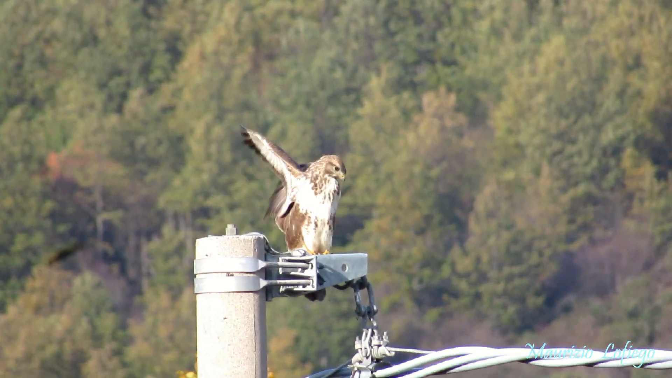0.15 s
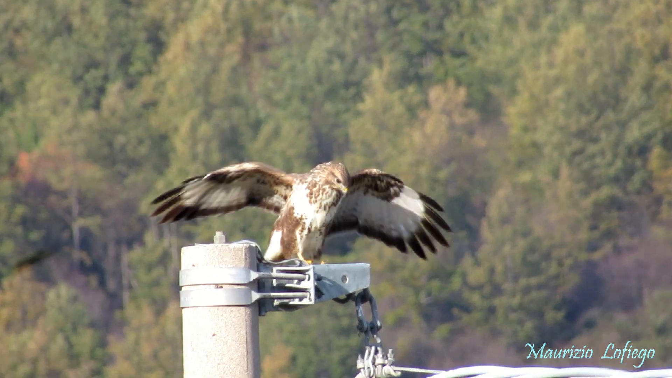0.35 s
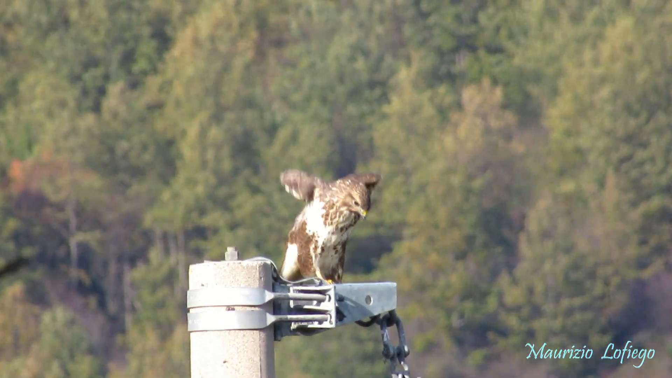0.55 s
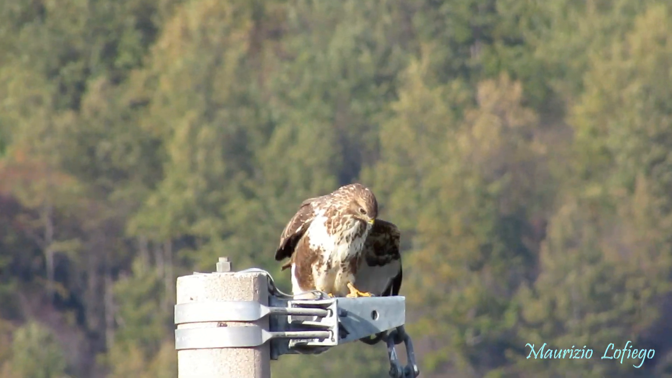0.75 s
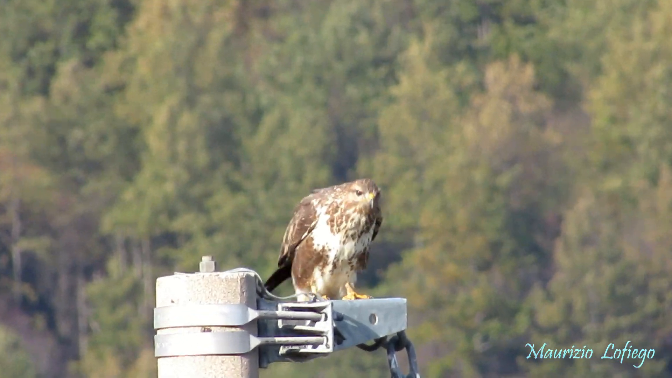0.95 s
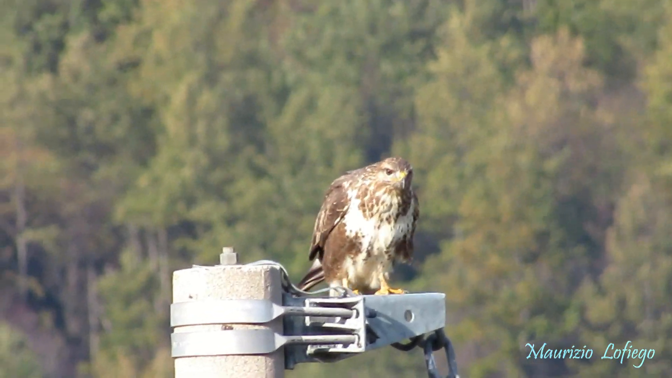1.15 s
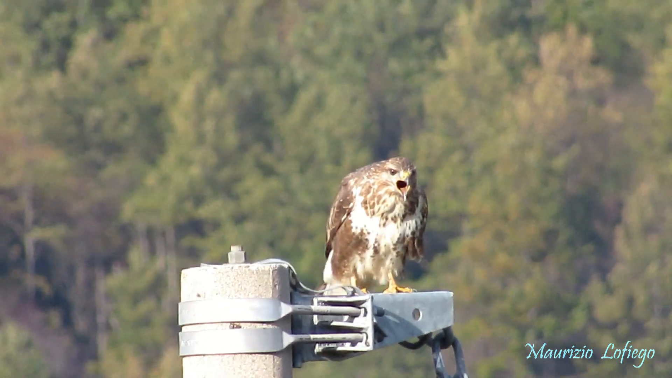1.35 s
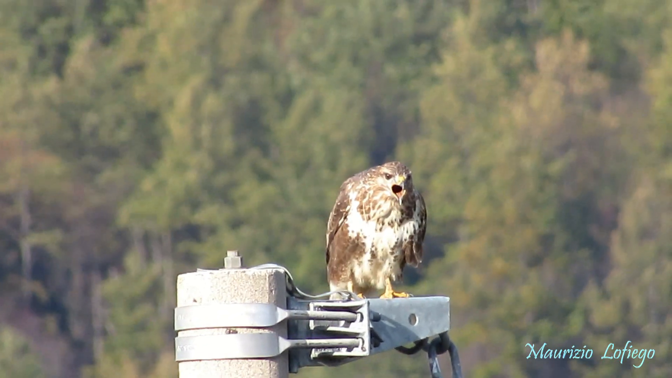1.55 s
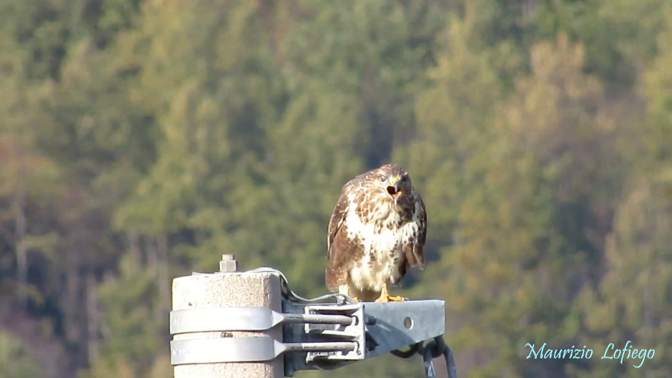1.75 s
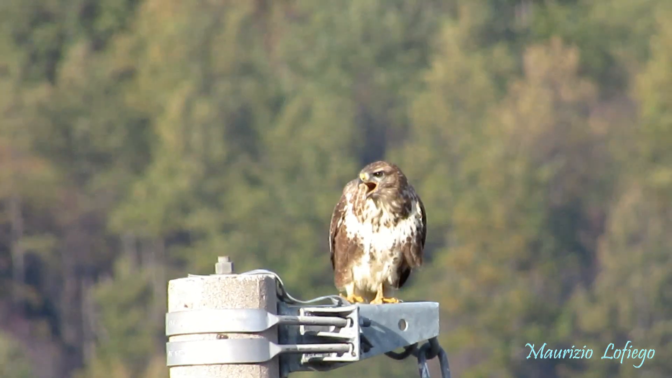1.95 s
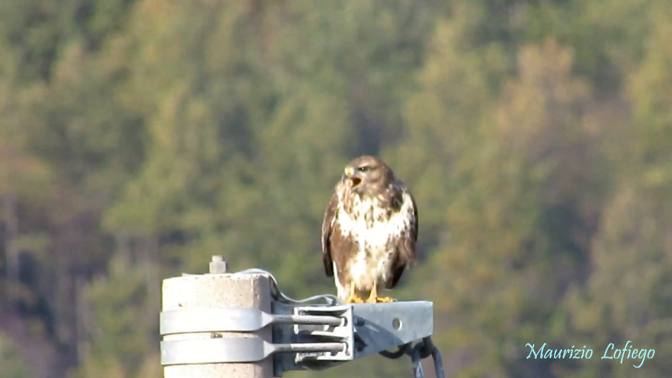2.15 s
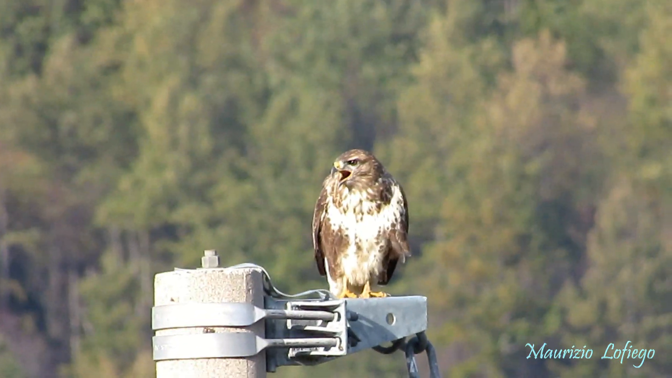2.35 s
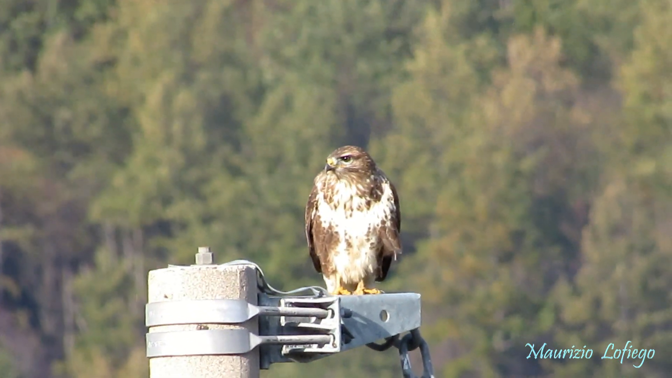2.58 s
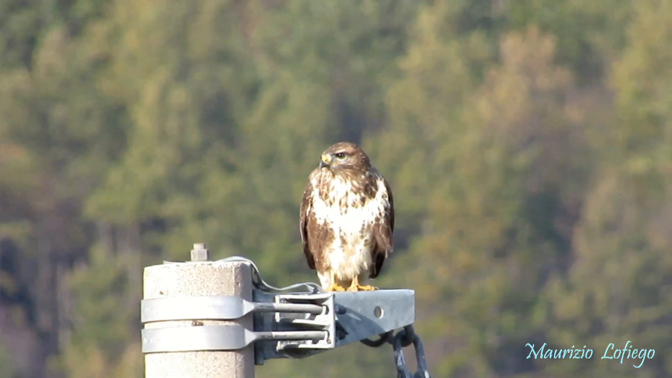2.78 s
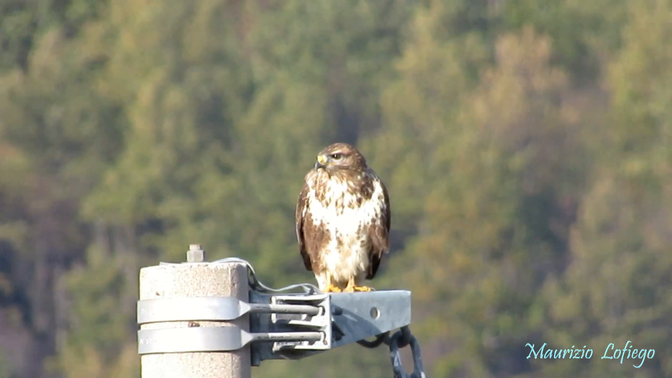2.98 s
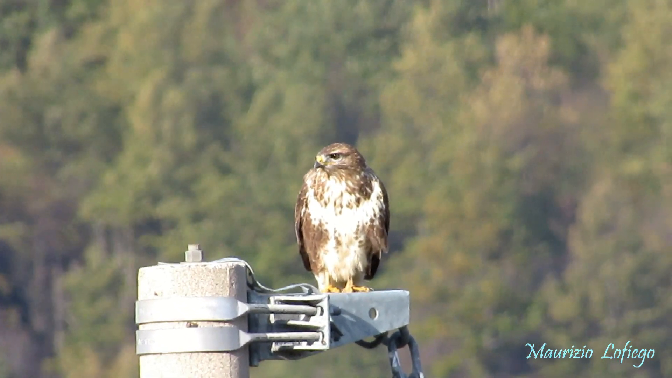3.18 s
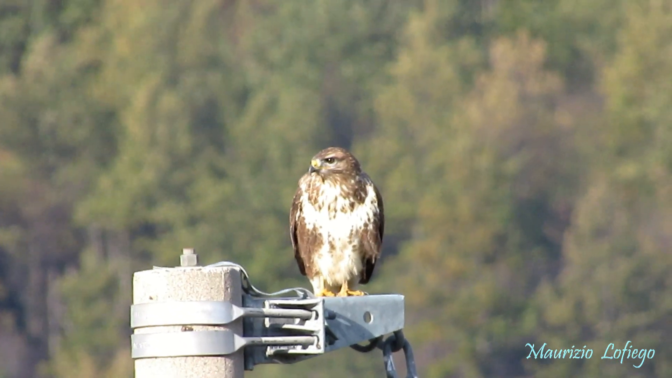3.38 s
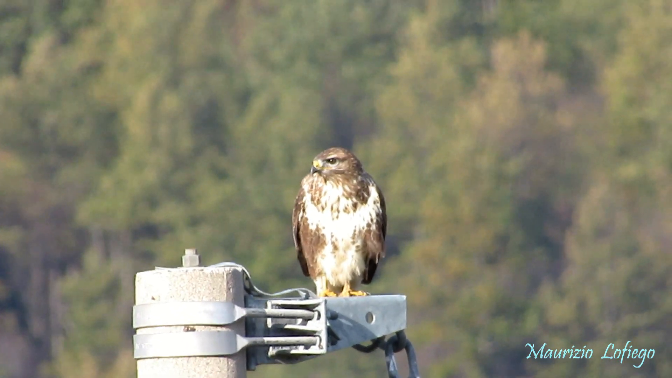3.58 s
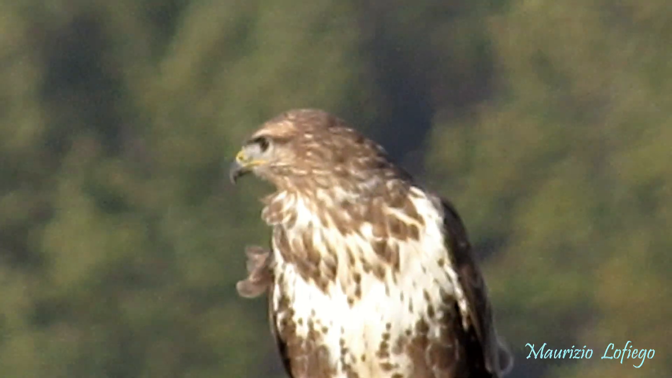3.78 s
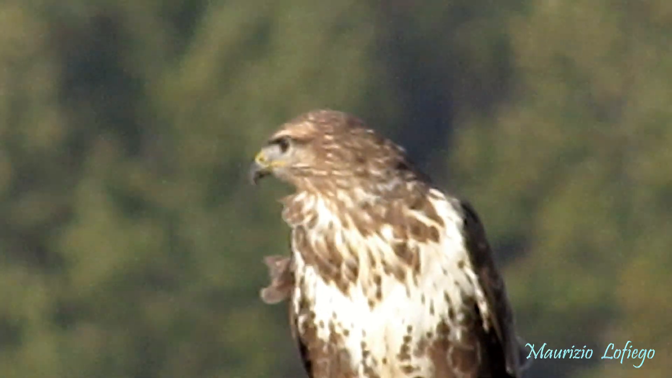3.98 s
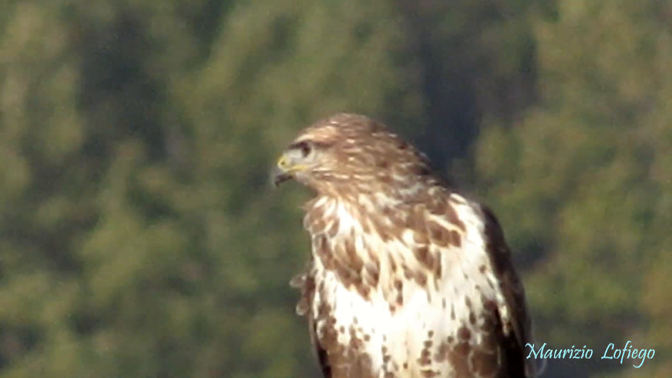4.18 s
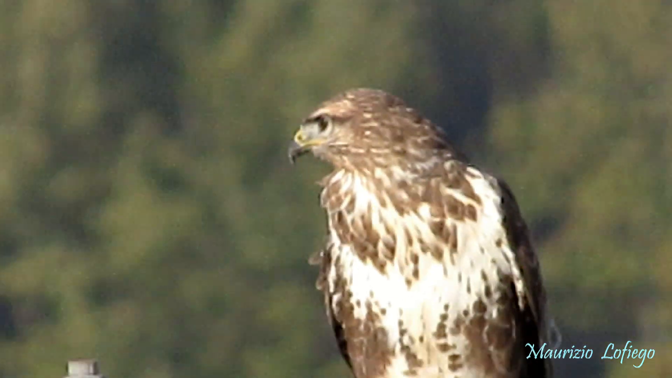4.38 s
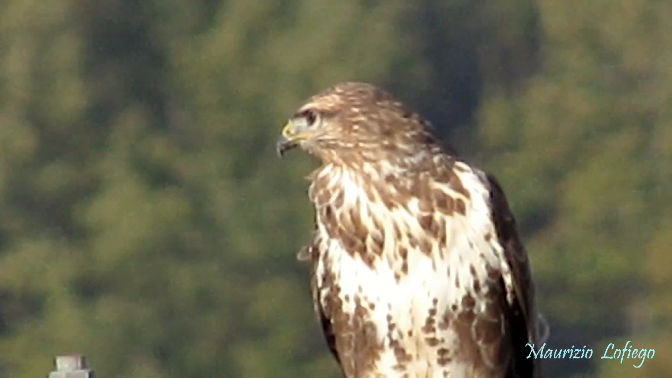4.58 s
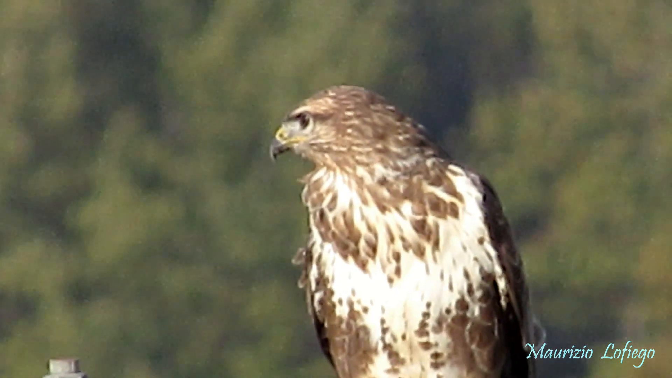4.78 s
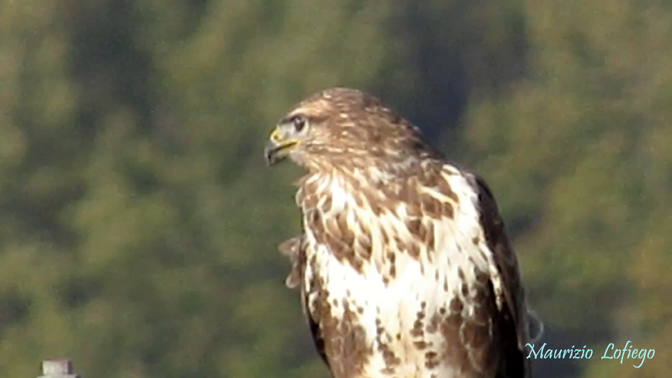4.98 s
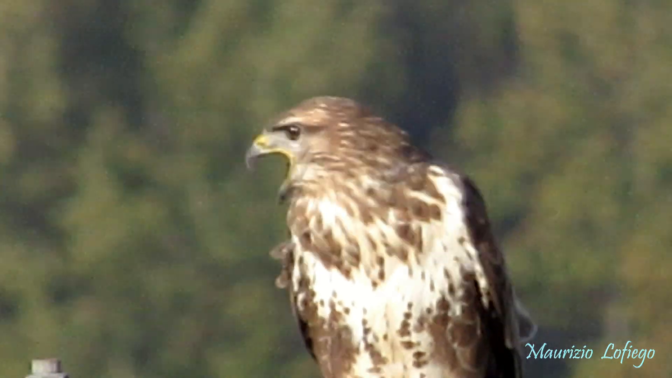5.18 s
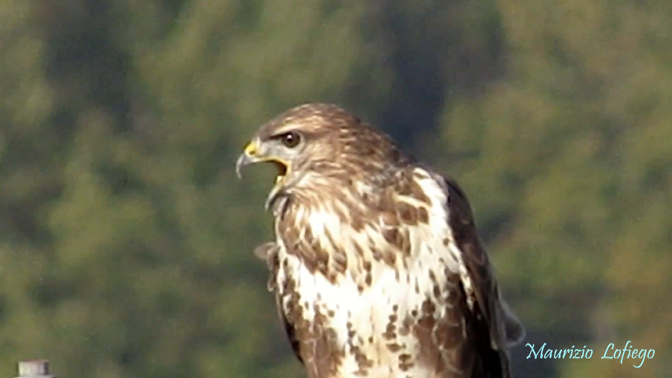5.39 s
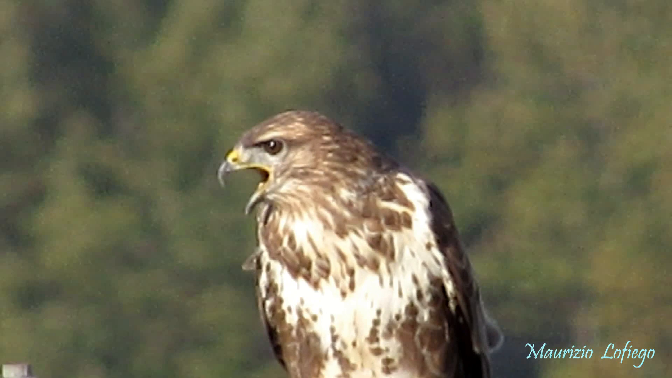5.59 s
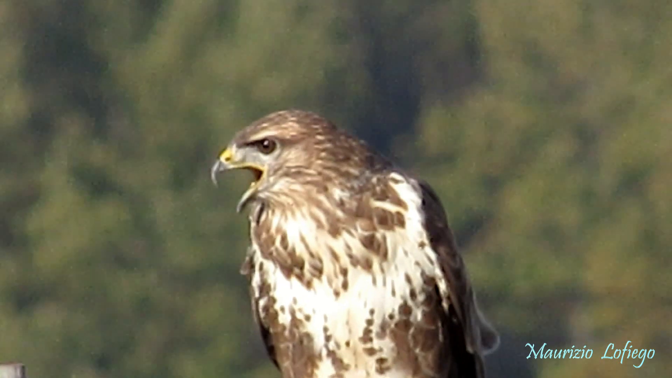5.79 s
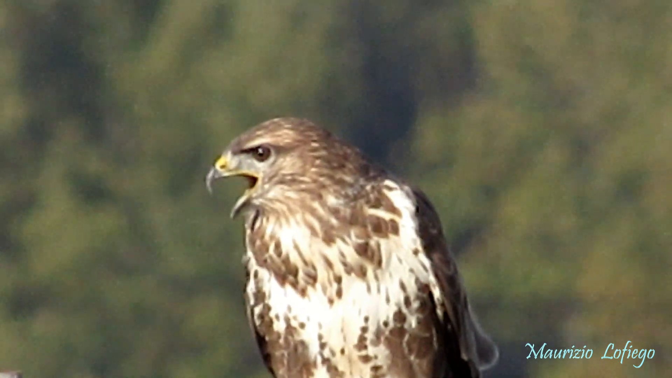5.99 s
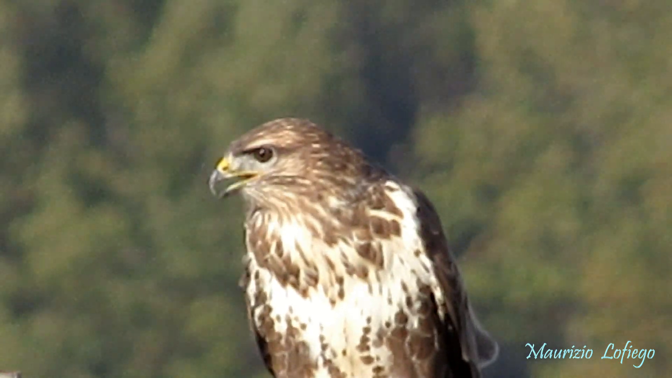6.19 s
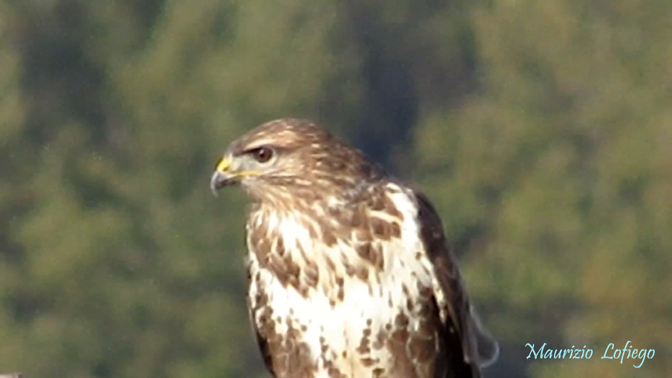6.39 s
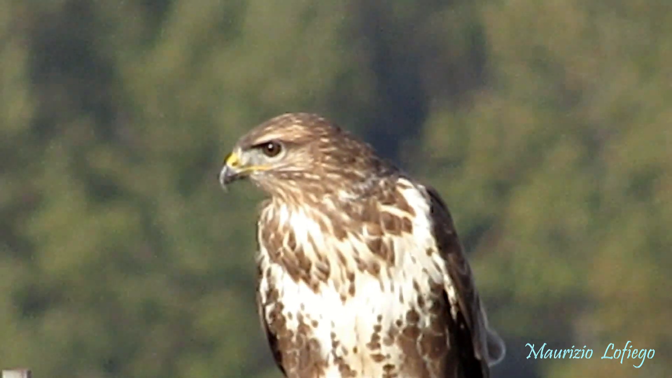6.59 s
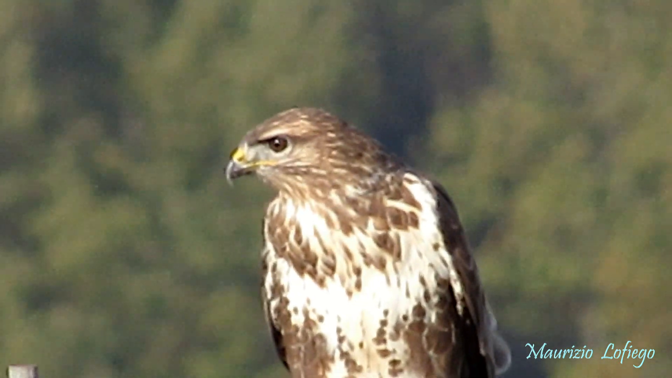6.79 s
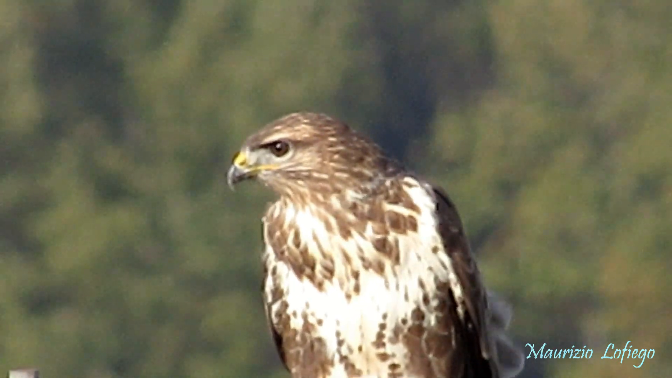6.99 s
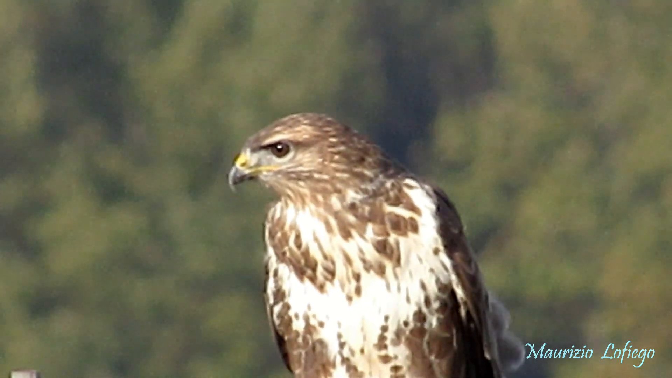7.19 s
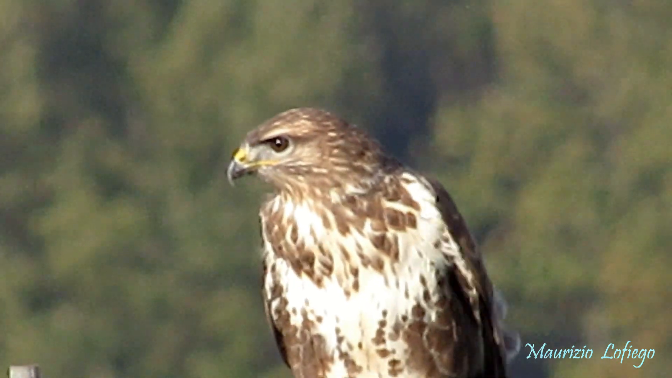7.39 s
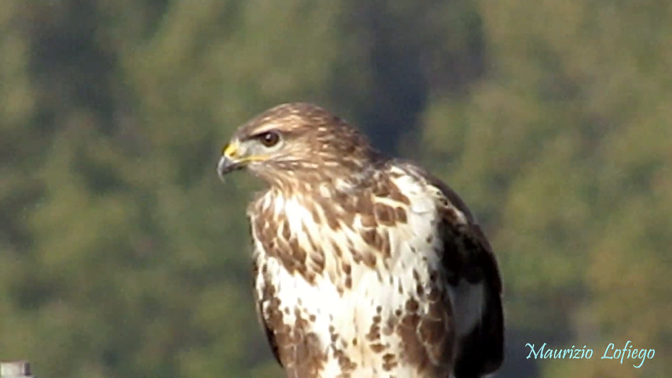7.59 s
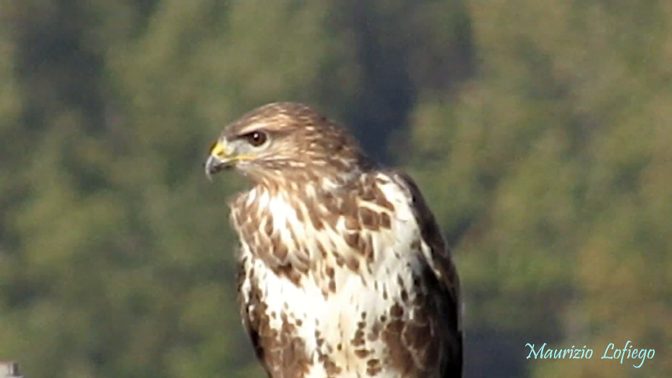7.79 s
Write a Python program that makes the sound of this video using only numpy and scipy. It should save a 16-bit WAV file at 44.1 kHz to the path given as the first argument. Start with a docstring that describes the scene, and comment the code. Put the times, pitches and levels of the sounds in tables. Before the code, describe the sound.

A buzzard gives two loud falling mews, the first turning raspy, in a quiet woodland with soft echoes and faint high bird ticks.

```python
"""A buzzard on a pole before a wooded slope mews twice: each call leaps up, then sinks through the resonances
of throat and beak, and the first breaks into a rasp where a second vibration lurches about. Another buzzard
answers far off with one wavering harmonic, and a small bird ticks in warbled whistles. Delayed copies and
scattered noise tails send soft echoes back from ground and trees. Beneath lies a low outdoor hush of filtered
noise, with short noise swells as bumps and scuffs at the microphone, and a soft click as the buzzard closes its
second call."""
import sys
import numpy as np
from scipy import signal
from scipy.fft import rfft, irfft
from scipy.io import wavfile
from scipy.ndimage import uniform_filter1d

SR = 44100
rng = np.random.default_rng(int(sys.argv[2]) if len(sys.argv) > 2 else 0)


def store_wav(level_fs):
    """Save 16-bit WAV to argv[1]."""
    pcm = np.round(np.clip(np.atleast_2d(level_fs), -1, 1) * 32767)
    wavfile.write(sys.argv[1], SR, pcm.T.astype(np.int16))


N = 346123
TIME = np.arange(N) / SR
FREQS = np.maximum(np.arange(N // 2 + 1) * SR / N, 1)

# the cry dips, and its edge changes, where no harmonic meets the main resonance
HOLLOW_HZ, HOLLOW_WIDTH_HZ = 1014, 32


def from_db(db):
    """Decibels to gain."""
    return 10 ** (np.asarray(db) / 20)


def rms_one(x):
    """Scale to unit rms."""
    return x / np.sqrt(np.mean(x ** 2) + 1e-20)


def ramp(x):
    """Hold between 0 and 1."""
    return np.clip(x, 0, 1)


def bell(x, width):
    """A smooth bump of height 1 around zero."""
    return np.exp(-(x / width) ** 2)


def in_time(rows):
    """Columns of a curve, at every sample."""
    s, *columns = np.transpose(rows)
    return [np.interp(TIME, s, c) for c in columns]


def gate(rows, fade=0.0031):
    """Open between the first and last row of a curve."""
    return ramp(np.minimum(TIME - rows[0][0], rows[-1][0] - TIME) / fade)


def colour(x, gain):
    """Filter by a gain for every frequency."""
    return irfft(rfft(x) * gain, N)


def humps(rows):
    """Bell-shaped rises and dips, in dB at every frequency."""
    return sum(db * bell(FREQS - hz, width) for hz, width, db in rows)


def shelf(x, above_hz, db):
    """Raise or lower everything above a frequency by a changing amount."""
    above = colour(x, 1 / (1 + (above_hz / FREQS) ** 20))
    return x + (from_db(db) - 1) * above


def flutter(rate_hz):
    """Random wavering up to about the given rate, at unit rms."""
    lowpass = signal.butter(2, min(rate_hz, .4 * SR), fs=SR, output="sos")
    return rms_one(signal.sosfilt(lowpass, rng.standard_normal(N)))


def evened(x, window=.02):
    """Hold the short-term level near 1; the window is in seconds."""
    size = max(int(window * SR), 2)
    power = uniform_filter1d(uniform_filter1d(x * x, size), size)
    return x / np.sqrt(np.abs(power) + 1e-12)


def turning(hz, jitter, jitter_hz):
    """Phase of a vibration whose pitch wavers by a fraction (jitter)."""
    return 2 * np.pi * np.cumsum(hz * (1 + jitter * flutter(jitter_hz))) / SR


def hush():
    """Steady outdoor noise; its low end is mostly opposed between the two channels."""
    # spectrum common to both channels, before its humps: frequency_hz, relative_level_db
    mid_points = [(12, -31.5), (20, -14), (85, -0.5), (213, 0), (282, -4.5), (315, -3.5), (452, -8),
                  (505, -3.5), (649, -9.5), (906, -10), (1820, -17.5), (2610, -21), (4950, -26),
                  (13500, -28.5), (15500, -40.5)]
    # spectrum opposed between the channels: frequency_hz, relative_level_db
    side_points = [(12, -35), (20, -13), (109, -0.5), (252, -3.5), (478, -10.5), (614, -17.5), (686, -39),
                   (746, -21), (932, -19), (1540, -26.5), (2330, -36.5), (2610, -38), (3450, -40),
                   (13100, -40.5), (15500, -55.5)]
    # humps and hollows of the common spectrum: centre_hz, width_hz, gain_db
    mid_humps = [(286.5, 17.5, 7), (498.3, 17.5, 7), (662, 79, -10.5), (982, 106, 3.5)]
    mid_db, side_db = -54.5, -46.5

    def noise(points, extra_db):
        hz, db = np.transpose(points)
        spectrum_db = np.interp(np.log(FREQS), np.log(hz), db) + extra_db
        return rms_one(colour(rng.standard_normal(N), from_db(spectrum_db)))

    mid = from_db(mid_db) * noise(mid_points, humps(mid_humps))
    side = from_db(side_db) * noise(side_points, 0)
    return mid + side * np.array([[1], [-1]])


def bumps():
    """Short swells of narrow noise: low nudges on the microphone, a few faint scuffs, and a soft click as the
    buzzard closes its second call."""
    # bumps, scuffs and the buzzard's closing click: centre_s, level_db, centre_hz, length_s
    swells = [(0.034, -58, 2520, 0.014), (0.662, -50.5, 2600, 0.0036), (0.68, -67, 2680, 0.035),
              (2.267, -48.5, 66, 0.049), (2.745, -57, 55.3, 0.14), (2.835, -56, 65, 0.082),
              (6.085, -45.5, 258, 0.036), (6.401, -57.5, 1980, 0.025), (7.098, -52, 43.1, 0.027)]
    out = 0
    for s, db, hz, length in swells:
        half_width = 30 + 0.067 * hz
        edges = [max(hz - half_width, 15), hz + half_width]
        band = signal.butter(2, edges, "band", fs=SR, output="sos")
        noise = rms_one(signal.sosfilt(band, rng.standard_normal(N)))
        out = out + from_db(db) * np.exp(-2 * ((TIME - s) / length) ** 2) * noise
    return out


def woods(x, wet_db, t60, delay, dull_hz, spread=0.8):
    """Leaves and trunks scatter a thin, dull tail (t60 and delay in s), slightly different on each side."""
    t = TIME[:2 * SR]
    scatter = rng.standard_normal(len(t)) + spread * rng.standard_normal((2, len(t)))
    tail = scatter * from_db(-60 * t / t60) * ramp(t / delay - .5)
    tail = tail / np.sqrt(np.sum(tail[0] ** 2))
    lowpass = signal.butter(1, min(dull_hz, .4 * SR), fs=SR, output="sos")
    tail = signal.sosfilt(lowpass, tail)
    return from_db(wet_db) * signal.fftconvolve(x[None], tail, axes=1)[:, :N]


def small_bird(swing=0.065, swing_hz=700, sweep=0.067, tick_db=-0.5, early_s=0.001, low_hz=5700, high_hz=7750):
    """Each tick is a short, fiercely warbled whistle that slides down within the band of a tiny throat."""
    # ticks, each begun early_s sooner and offset by tick_db: start_s, level_db, start_hz, length_s
    tick_rows = [(1.476, -49.5, 7230, 0.016), (3.3132, -42.5, 7210, 0.01), (3.483, -45.5, 7200, 0.013),
                 (4.51, -45, 7000, 0.012), (4.658, -43.5, 7120, 0.016), (4.947, -41.5, 6900, 0.012),
                 (5.126, -38, 7050, 0.012), (7.099, -44.5, 6520, 0.01)]
    out, warble = np.zeros(N), flutter(swing_hz)
    for s, db, hz, length in tick_rows:
        at = int((s - early_s) * SR) + np.arange(max(int(length * SR), 8))
        age = np.linspace(0, 1, len(at))
        pitch = hz * (1 + swing * warble[at] - sweep * age)
        phase = 2 * np.pi * np.cumsum(pitch) / SR
        swell = np.abs(np.sin(np.pi * age ** 0.66))
        out[at] += from_db(db + tick_db) * swell * np.sin(phase)
    return signal.sosfilt(signal.butter(3, [low_hz, high_hz], "band", fs=SR, output="sos"), out)


def far_buzzard():
    """Only the strongest harmonic, the second, carries over the distance."""
    # course of the far answer: time_s, fundamental_hz, level_db
    answer = [(3.73, 1140, -98), (3.785, 1150, -61.5), (3.83, 1150, -58.5), (3.855, 1130, -90),
              (3.9, 1070, -63), (3.94, 1050, -71), (3.99, 1046, -87)]
    pitch, db = in_time(answer)
    tone = rms_one(np.sin(turning(2 * pitch, jitter=0.0075, jitter_hz=100)))
    return from_db(db) * gate(answer) * tone


def throat(x, leak_db=-43):
    """Steep-sided resonances with narrow antiresonances between them, and a weak leak."""
    # resonances of throat and beak, narrowed below: centre_hz, nominal_width_hz, level_db
    resonances = [(970, 810, -19.5), (1533, 260, -2), (1815, 250, -1.5), (2202, 285, 3), (2690, 440, -27),
                  (2830, 180, -5.5), (3260, 213, -6.5), (3620, 91, -10), (4090, 160, -11.5),
                  (4470, 300, -47), (5700, 290, -13.5), (6400, 190, -16), (7760, 2000, -27.5)]
    # antiresonances of throat and beak: centre_hz, width_hz, gain_db
    notches = [(2026, 60, -13), (3095, 78, -5.5), (3950, 90, -9), (6160, 72, -8)]
    gain = sum(from_db(db) / (1 + ((FREQS - hz) / (0.73 * width)) ** 2) ** 1.296
               for hz, width, db in resonances)
    gain = gain + from_db(leak_db) * FREQS / (FREQS + 600) / (1 + (FREQS / 9500) ** 4)
    return colour(x, gain * from_db(humps(notches)))


def whistle(pitch, jitter, fundamental_db, break_hz=945, break_width_hz=35, break_lag_s=0.0046, waver_db=4.0):
    """The tonal voice; as the pitch sinks through the break, the harmonic balance changes register."""
    # registers above and below the break, ahead of the throat: harmonic, upper_db, lower_db
    registers = [(2, 7, -8), (3, -10, 9.5), (4, 5, -27), (5, -3.5, -6), (6, -12.5, -6.5), (7, -6.5, -3),
                 (8, -7, -9.5), (9, -9.5, -19.5), (10, -10, -8)]
    # the membrane briefly doubles its period: centre_s, half_harmonic_db, length_s
    doublings = [(1.827, -15, 0.023), (2.485, -1.5, 0.064)]
    phase = turning(pitch, jitter, jitter_hz=306)
    lagging_pitch = np.interp(TIME - break_lag_s, TIME, pitch)
    upper = .5 + .5 * np.tanh((lagging_pitch - break_hz) / break_width_hz)
    stack = from_db(fundamental_db) * np.sin(phase)
    for k, high_db, low_db in registers:
        # harmonics above the third waver
        db = low_db + upper * (high_db - low_db) + waver_db * flutter(16) * (k > 3)
        stack = stack + from_db(db) * np.sin(round(k) * phase)
    doubled = sum(from_db(db) * bell(TIME - s, length) for s, db, length in doublings)
    half = doubled * np.sqrt(2) * np.sin((2 + .5) * phase)
    return evened(throat(stack), window=0.015) + half


def rasp(pitch, second_hz, top_db=-9.0, smear_db=-2.5, hiss_db=0.0, hiss_top_hz=3650, throb_db=3.0):
    """Chaotic vibration: a second tone lurches, the third harmonic smears, the air comes in uneven bursts."""
    phase = turning(second_hz, jitter=.07, jitter_hz=448.0)
    # the harder the push, the higher the second tone and the stronger its octave
    octave = from_db(np.interp(second_hz, [1500, 1850], [-6, 3]))
    overtones = sum(np.sin(k * phase) for k in range(3, 5))
    second = np.sin(phase) + octave * np.sin(2 * phase) + from_db(top_db) * overtones
    smear = np.sin(3 * turning(pitch, jitter=0.099, jitter_hz=349.0))
    hiss = colour(flutter(7000), 1 / (1 + (FREQS / hiss_top_hz) ** 20))
    air = second + from_db(smear_db) * smear + from_db(hiss_db) * hiss
    bursts = from_db(throb_db * flutter(210))
    return evened(throat(air * bursts), window=0.01)


def rasp_course():
    """The rasp's share of the power, its second vibration's pitch in Hz, its jitter and closing flare in dB."""
    start_s, end_s, attack_s, release_s = 1.975, 2.381, 0.033, 0.13
    full_share, full_jitter = 0.86, 0.038
    age, left = TIME - start_s, end_s - TIME
    share = ramp(full_share * ramp(age / attack_s) * ramp(left / release_s))
    # the second vibration rises and falls in one skewed arch with the push of air
    base_hz, arch_hz, arch_s, arch_skew = 1442, 428.4, 0.335, 0.88
    second_hz = base_hz + arch_hz * np.sin(np.pi * ramp(age / arch_s) ** arch_skew)
    # the pitch is unsettled more and more
    jitter = full_jitter * ramp(age / (end_s - start_s)) ** 2 * ramp(left / attack_s)
    # it turns shrill just before it gives way
    flare_db, flare_lead_s, flare_s = 16.5, 0.077, 0.071
    return share, second_hz, jitter, flare_db * bell(left - flare_lead_s, flare_s)


def mew_pitch(start, broken, slide, aim_hz, sag):
    """The sinking line of a mew, and the sung pitch that leaps up to it from rest."""
    rest_hz, leap_s = 746, 0.022
    break_drop_hz, break_s = 103, 0.022
    wail_sag_hz_per_s, slide_drop_hz, slide_s = 172, 73.74, 0.054
    age, wail_age = np.maximum(TIME - start, 0), np.maximum(TIME - broken, 0)
    line = aim_hz - sag * (age - wail_age) - wail_sag_hz_per_s * wail_age
    line = line - break_drop_hz * (1 - np.exp(-wail_age / break_s))
    line = line - slide_drop_hz * (.5 + .5 * np.tanh((TIME - slide) / slide_s))
    return line, line - (aim_hz - rest_hz) * np.exp(-age / leap_s)


def mew_level(line, start, swell, fade, end, catch_db, cry_db, wail_db, close_s=0.018):
    """A hoarse catch, then the swell, loud cry, hollow, steady wail and fade."""
    # the level dips for an instant: centre_s, gain_db, length_s
    dip_rows = [(1.927, -13, 0.01), (5.65, -24, 0.0044), (6.04, -5, 0.011)]
    catch_lag_s, catch_s, swell_s = 0.0081, 0.012, 0.034
    # the cry thins to the wail's level as the pitch sinks
    full_cry_hz, thinning_hz, hollow_gain_db = 1140, 134, -8
    db = cry_db + (wail_db - cry_db) * ramp((full_cry_hz - line) / thinning_hz)
    db = db + hollow_gain_db * bell(line - HOLLOW_HZ, HOLLOW_WIDTH_HZ)
    db = db + sum(dip_db * bell(TIME - s, length) for s, dip_db, length in dip_rows)
    # the wail fades to a thin, shaky thread
    fade_db_per_s, thread_db, shake_db, shake_hz = 107, -21, 4, 25.2
    spent = ramp((TIME - fade) * fade_db_per_s / abs(thread_db))
    db = db + spent * (thread_db + shake_db * flutter(shake_hz))
    sounding = ramp((TIME - swell) / swell_s) * ramp((end - TIME) / close_s)
    catch = from_db(catch_db) * bell(TIME - start - catch_lag_s, catch_s)
    return from_db(db) * sounding + catch


def buzzard(edge_hz=3900, top_hz=6500):
    """Both mews: the falling pitch carries first the second, then the third harmonic through the main resonance."""
    # each mew is a high cry that breaks into a lower wail, slides down once more and fades:
    # start_s, swell_s, break_s, slide_s, fade_s, end_s, aim_hz, sag_hz_per_s,
    # catch_db, cry_db, wail_db, fundamental_db (ahead of the throat),
    # bright_db (above edge_hz), hollow_db (extra there in the hollow), top_db (extra above top_hz)
    mew_rows = [(1.6501, 1.662, 1.9383, 2.262, 2.338, 2.64, 1281, 1102, -36.5, -28, -38.5, -16, -1.5, 8, 2),
                (5.4261, 5.447, 5.737, 6.0036, 6.03, 6.385, 1245, 953, -41.5, -29, -39.5, -4, 2.5, -16, -14)]
    # overtones above edge_hz ring out at some pitches and sink at others: pitch_hz, gain_db
    edge_by_pitch = [(660, -6), (725, 9), (785, -9), (835, 5), (940, -14), (1065, -0.5), (1120, 8.5),
                     (1190, -3.5)]
    mews = np.array(mew_rows)
    nearest = np.abs(TIME[:, None] - mews[:, 0]).argmin(axis=1)
    (start, swell, broken, slide, fade, end, aim_hz, sag,
     catch_db, cry_db, wail_db, fundamental_db, bright_db, hollow_db, top_db) = mews[nearest].T
    line, pitch = mew_pitch(start, broken, slide, aim_hz, sag)
    rough, second_hz, fraying, flare_db = rasp_course()

    # pitch jitter as a fraction: clean voice, hoarse catch, fraying rasp
    clean_jitter, catch_jitter, hoarse_s = 0.0035, 0.0502, 0.024
    jitter = clean_jitter + catch_jitter * bell(TIME - start, hoarse_s) + fraying
    rasp_boost_db = 7 * rough
    level = mew_level(line, start, swell, fade, end, catch_db, cry_db, wail_db) * from_db(rasp_boost_db)

    tonal = np.sqrt(1 - rough) * whistle(pitch, jitter, fundamental_db)
    voice = tonal + np.sqrt(rough) * rasp(pitch, second_hz)
    ringing_db = np.interp(line, *np.transpose(edge_by_pitch))
    ringing_db = ringing_db + hollow_db * bell(line - HOLLOW_HZ, HOLLOW_WIDTH_HZ)
    edge_db = (1 - rough) * (bright_db + ringing_db) + flare_db
    return level * shelf(shelf(voice, edge_hz, edge_db), top_hz, top_db)


def at_microphones(x):
    """Two close ports: the sound reaches the left one first, as a phase lead shared between the two."""
    # lead of the left microphone over the right: frequency_hz, phase_rad
    left_lead = [(1000, 0.41), (2300, 0.31), (3400, 0.14), (5500, .01)]
    lead = np.interp(FREQS, *np.transpose(left_lead))
    return np.array([colour(x, np.exp(.5j * lead)), colour(x, np.exp(-.5j * lead))])


def scene():
    """The birds and bumps, a touch stronger on the right, with the birds' echoes over the hush."""
    # echoes off the ground and nearest trees: delay_s, level_db
    echo_rows = [(.047, -21.5), (.098, -29.5)]
    mews, ticks = buzzard(), small_bird()
    echoes = sum(from_db(db) * np.interp(TIME - delay, TIME, mews) for delay, db in echo_rows)
    birds = at_microphones(mews + echoes + far_buzzard())
    birds = birds + woods(mews, wet_db=-15.0, t60=0.98, delay=0.015, dull_hz=6100)
    # twigs round the small bird smear each tick at once; the trees add a tail
    twigs = woods(ticks, wet_db=1.5, t60=0.028, delay=0.0011, dull_hz=14000)
    trees = woods(ticks, wet_db=-6, t60=0.27, delay=0.0065, dull_hz=12000)
    birds = birds + ticks + twigs + trees
    return (birds + bumps()) * from_db([[-.5], [.5]]) + hush() * from_db([[-.3], [.3]])


def record(dry):
    """The top is cut steeply by an elliptic low-pass."""
    cutoff_hz = 15600
    return signal.sosfilt(signal.ellip(10, .1, 70, cutoff_hz, fs=SR, output="sos"), dry)


dry = scene()
out = record(dry)
store_wav(out)
```